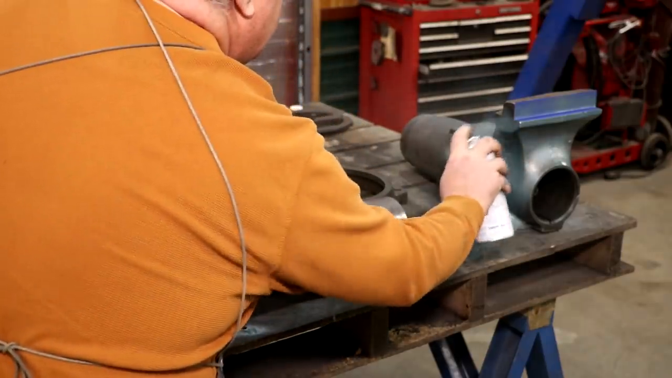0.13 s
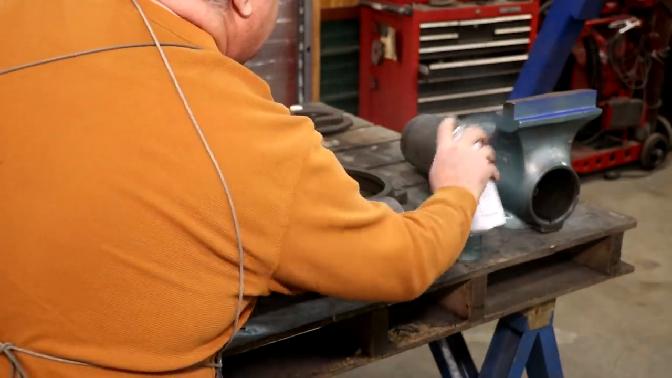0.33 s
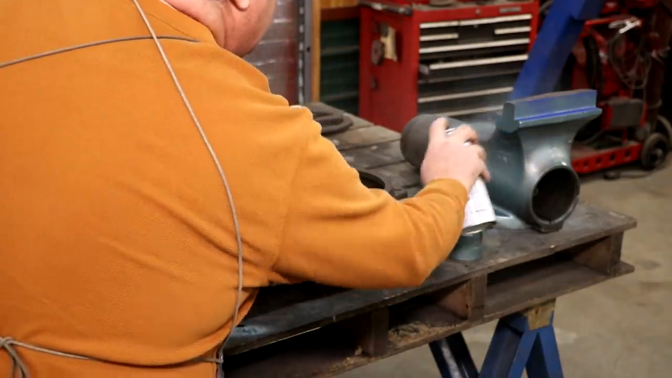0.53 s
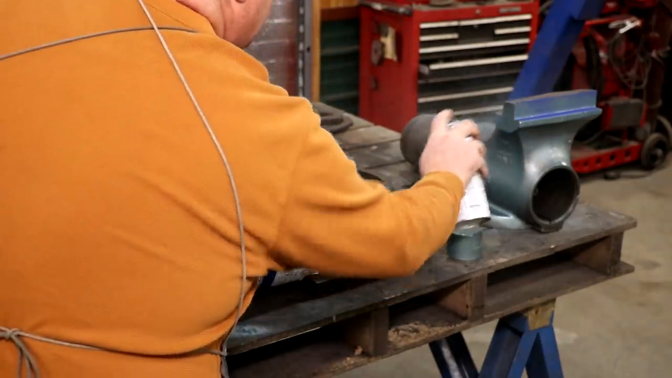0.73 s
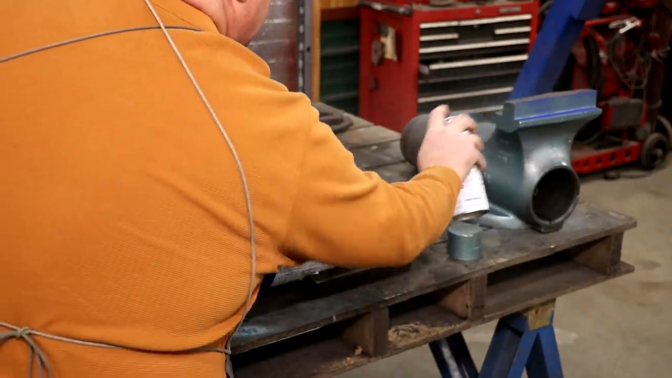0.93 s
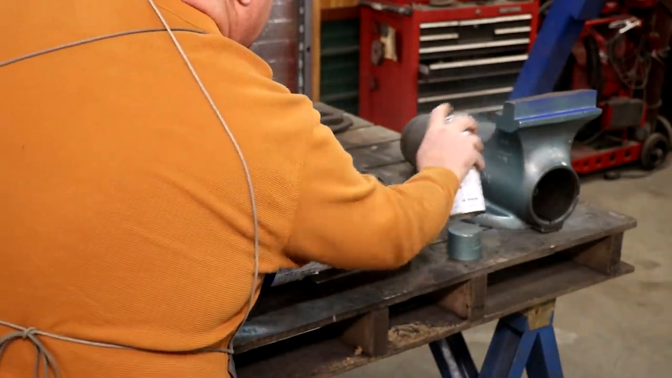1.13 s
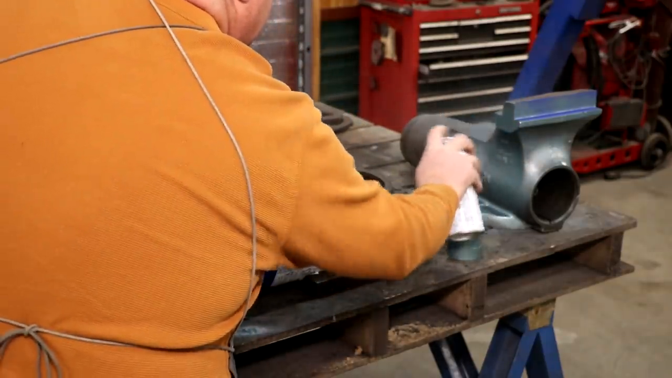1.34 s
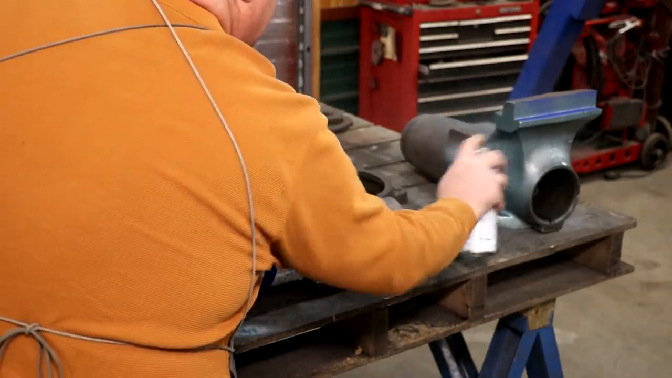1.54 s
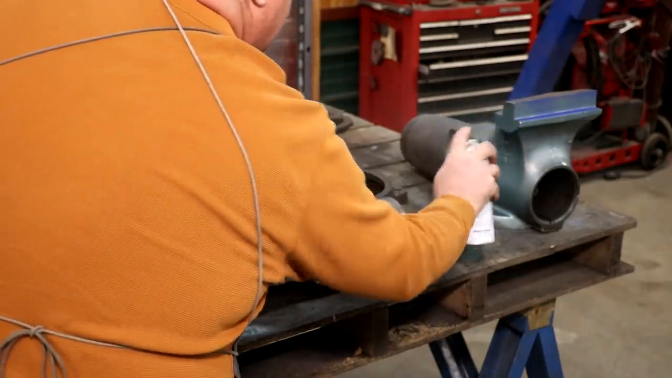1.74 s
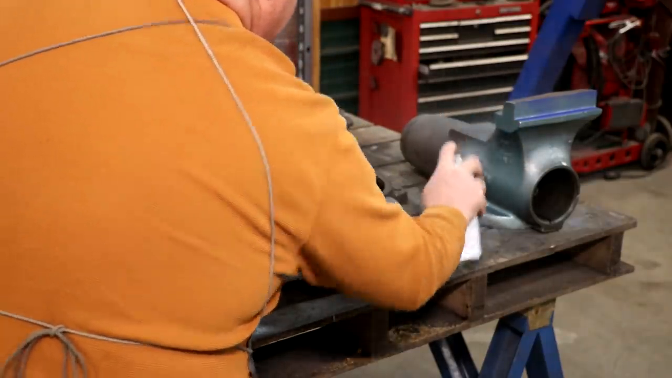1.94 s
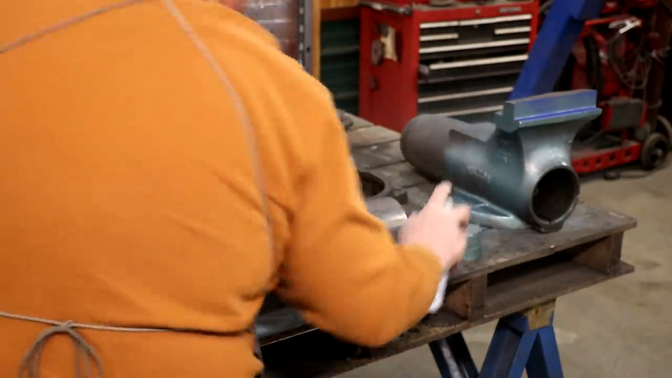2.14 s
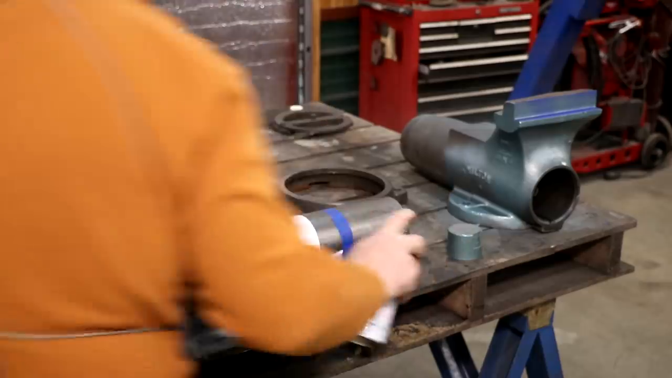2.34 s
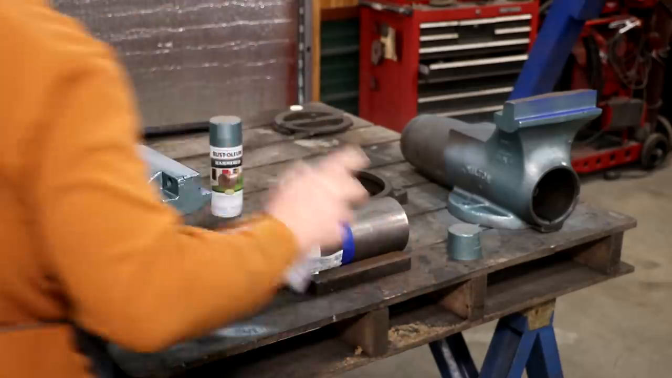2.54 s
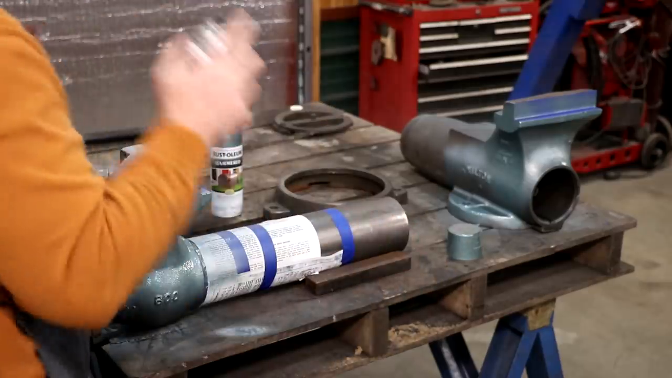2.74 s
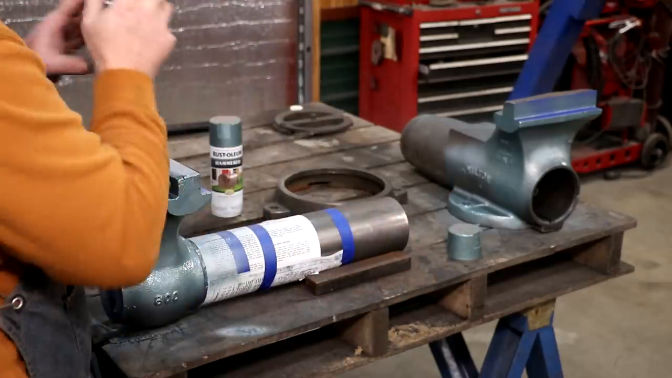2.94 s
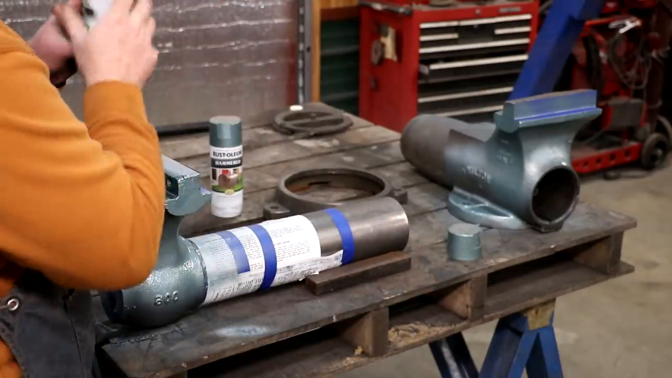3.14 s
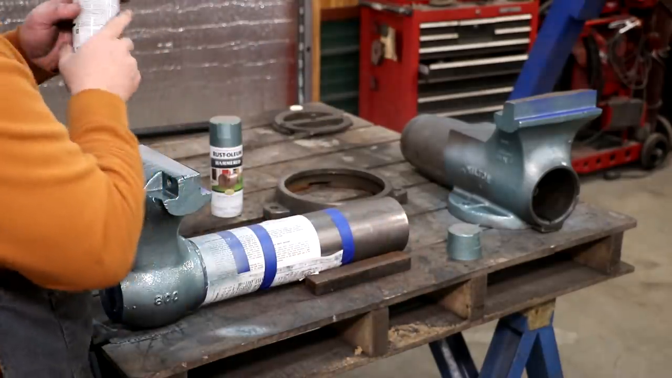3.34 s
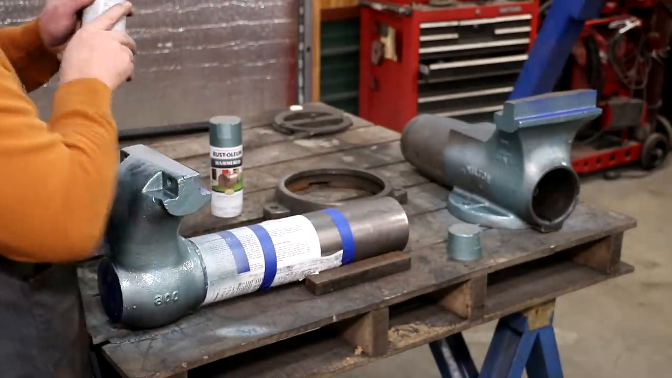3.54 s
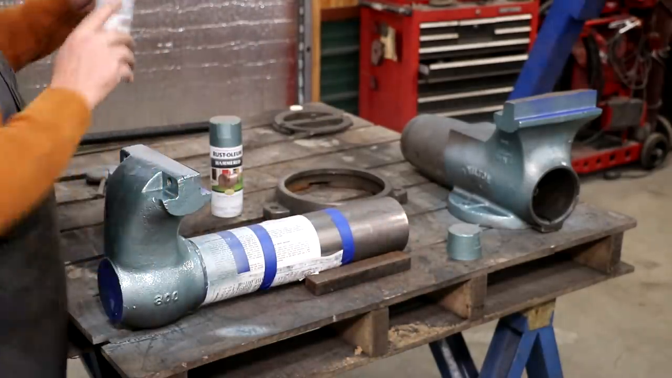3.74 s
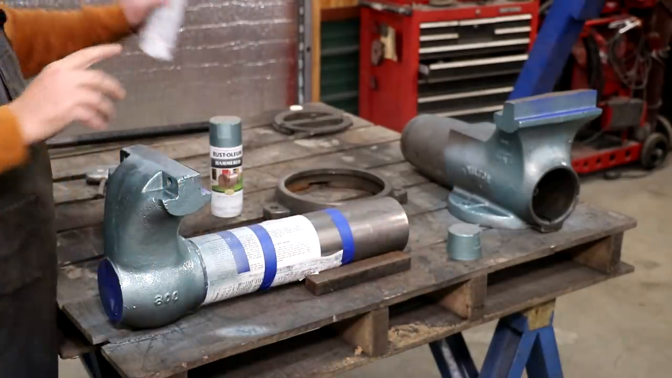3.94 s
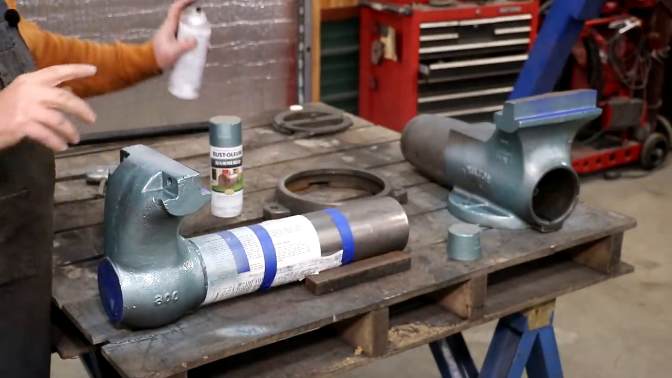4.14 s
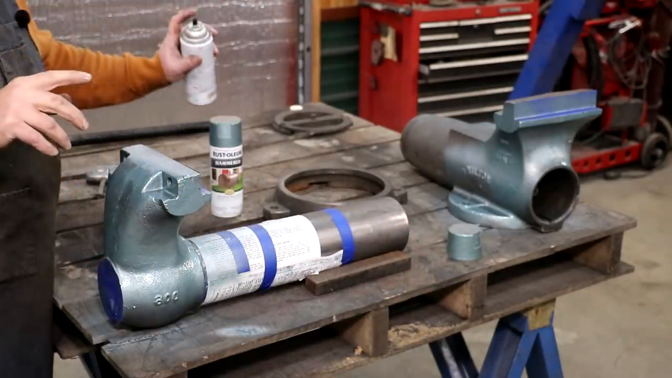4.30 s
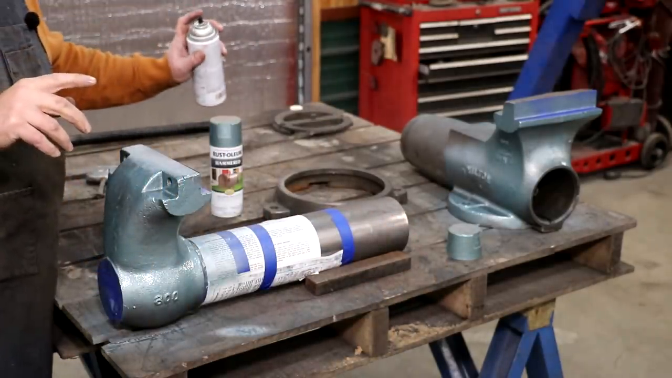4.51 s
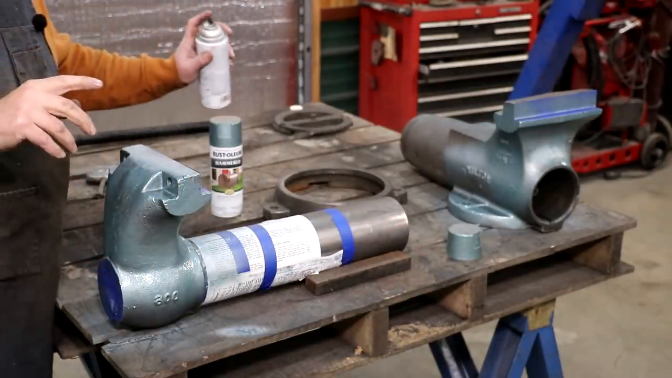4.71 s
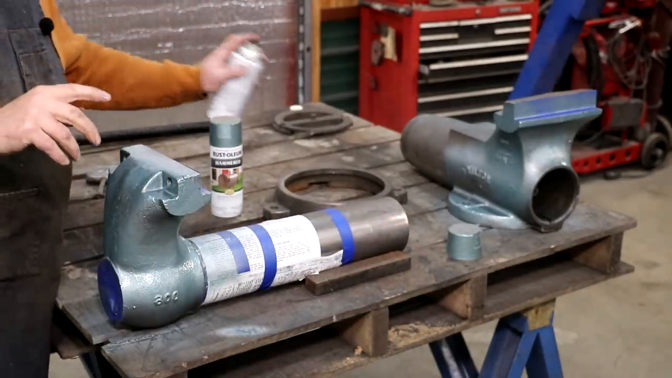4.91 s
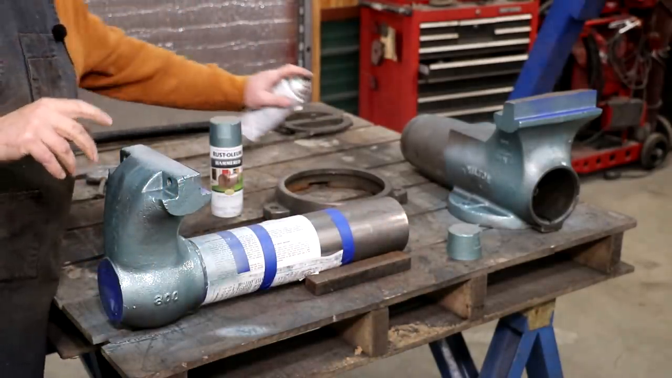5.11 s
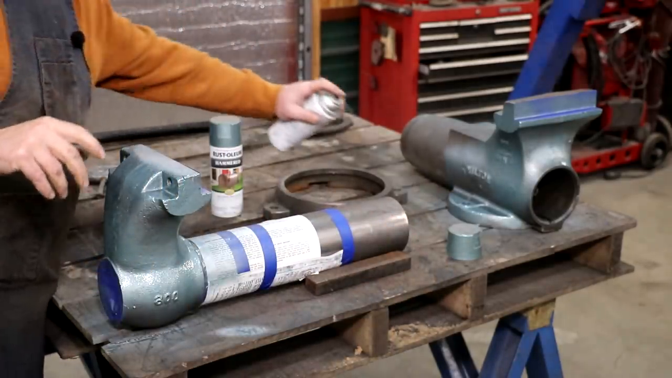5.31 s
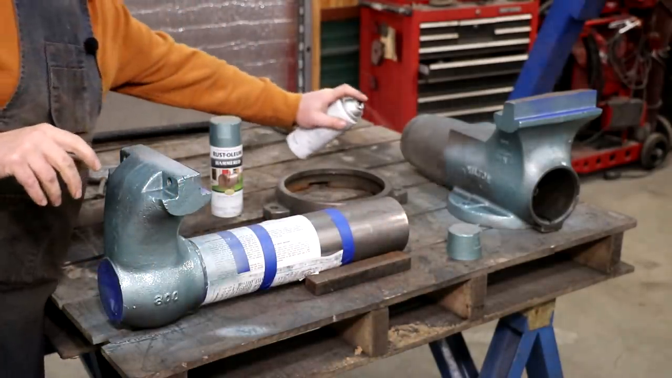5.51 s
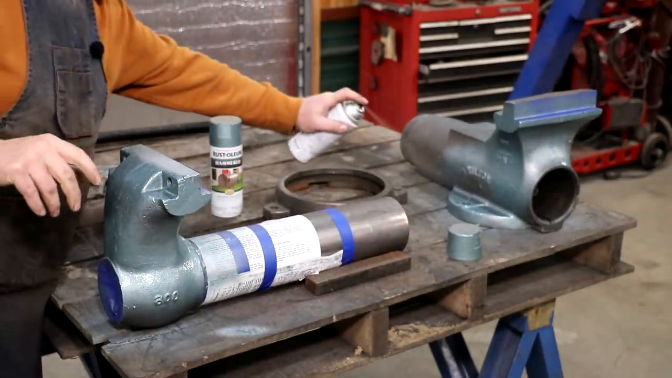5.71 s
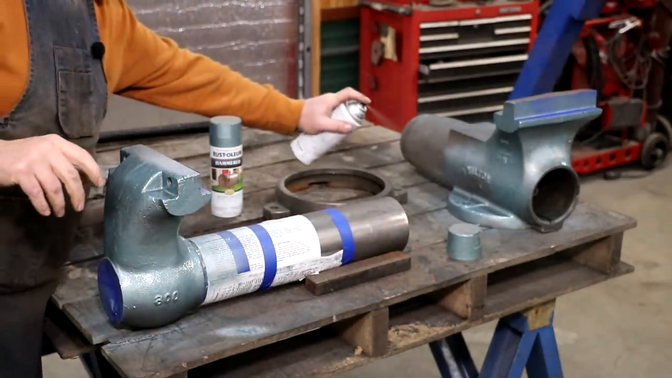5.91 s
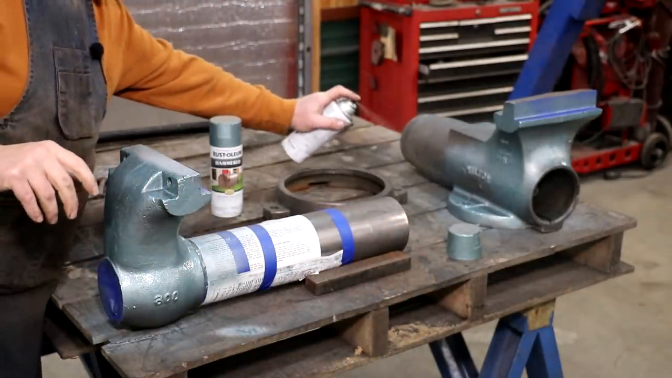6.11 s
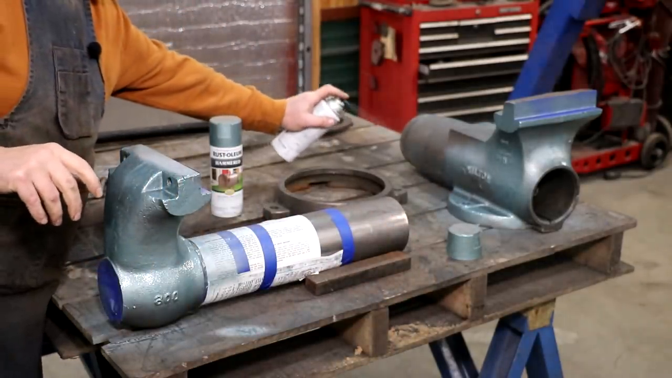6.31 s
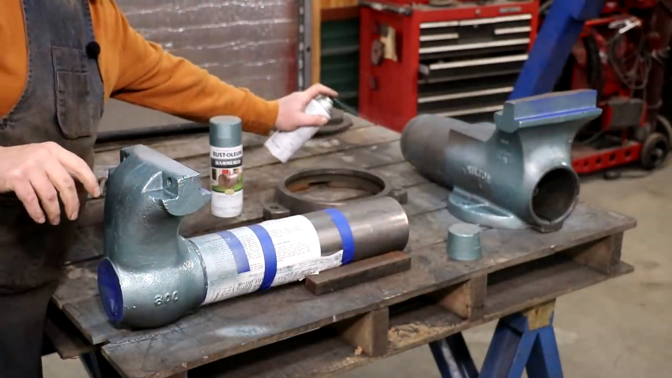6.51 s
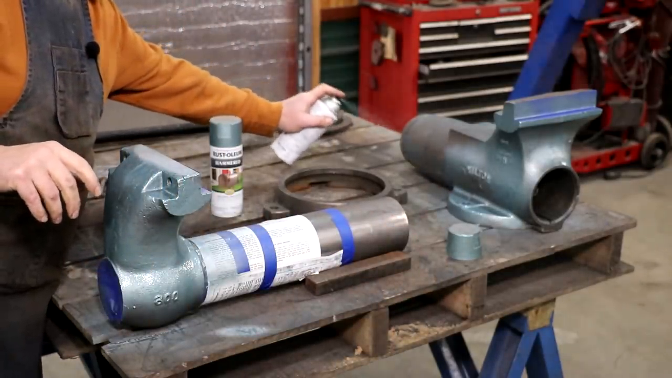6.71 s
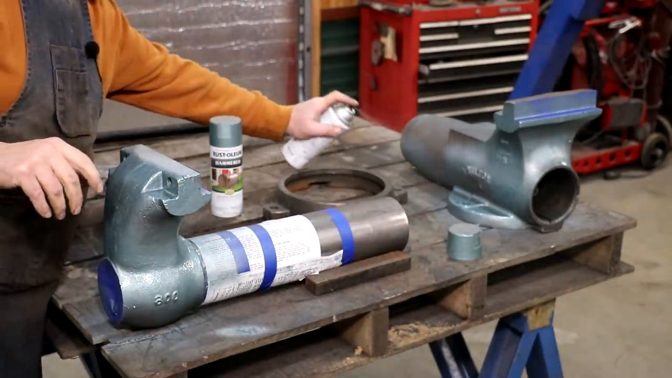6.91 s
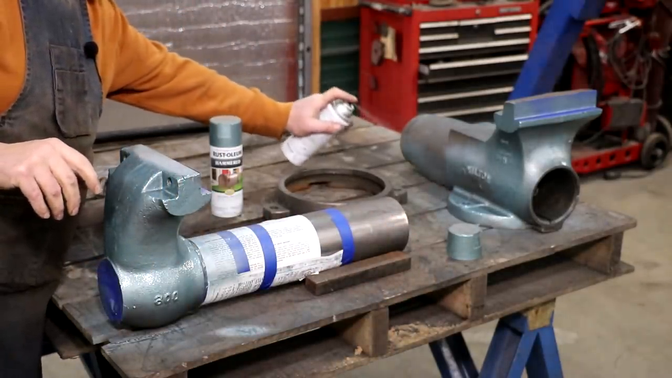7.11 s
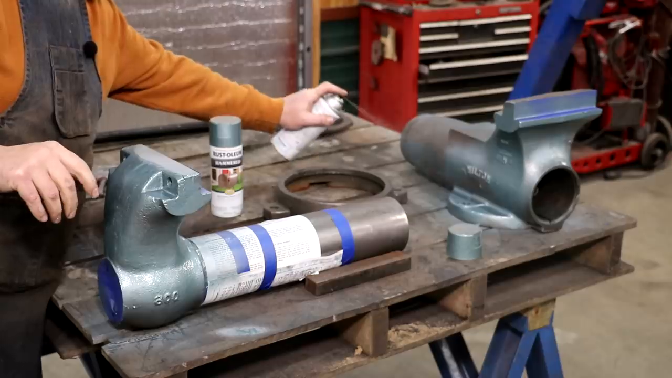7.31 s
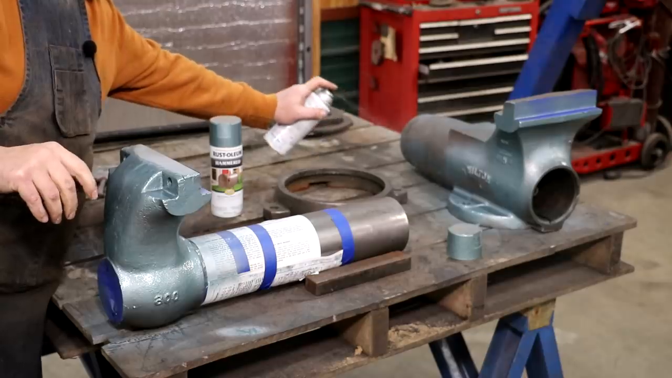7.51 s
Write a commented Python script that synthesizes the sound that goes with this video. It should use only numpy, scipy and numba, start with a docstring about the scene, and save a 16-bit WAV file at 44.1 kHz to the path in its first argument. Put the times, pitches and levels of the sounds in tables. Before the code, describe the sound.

A quiet workshop with faint low hum and hiss, heard from a microphone worn on the painter's chest, identical in both channels. From 0 to 2 s an aerosol can sprays nearby: a steady, bright, roaring hiss around 4 kHz, wavering slightly with the hand and reflecting off steel, then cutting off sharply. From 2 s cloth rubs the microphone in soft uneven scuffs while the can is turned; its ball scrapes and paint swishes. Knocks start near 2.65 s, cluster at 3.0-3.7, and peak with a loud clack at 4.0 followed by rapid rattling to 4.3. A crisp plastic double click comes at 4.6, then a few ball knocks at 4.8-5.15. From 5.2 s a softer, farther spray hisses unevenly, with small cloth thumps at 5.4 and 5.85. At 6.95 metal lands with a brief ringing clank and ticks until 7.1, echoing in the shop; the spray fades by 7.5.

```python
"""A spray can hisses over a steel casting in a workshop, heard by one microphone on the painter's chest.
The jet is coloured noise with a moving roar and echoes off the steel; the shop is quiet shaped noise.
He lets go, turns and tips the can: scraping noise and struck modes make its mixing ball roll and knock,
uneven noise makes his clothes rub the microphone, and the button clicks as a few short partials.
He then sprays from further off, while metal falls and clatters in the shop as ringing modes and ticks."""
import sys
import numpy as np
from scipy import signal
from scipy.fft import rfft, irfft
from scipy.io import wavfile
from scipy.ndimage import uniform_filter1d, map_coordinates
from numba import njit

SR = 44100
rng = np.random.default_rng(int(sys.argv[2]) if len(sys.argv) > 2 else 0)


def gain_from_db(level_db):
    """Turn a decibel level (scalar or array-like) into a linear amplitude factor."""
    decades = np.asarray(level_db, float) / 20
    return 10 ** decades


def master(y):
    """Save y as 16-bit WAV."""
    cut = np.clip(np.atleast_2d(y).T, -1, 1)
    pcm = np.round(cut * 32767)  # scale
    wavfile.write(sys.argv[1], SR, pcm.astype(np.int16))


N = 332955
T = np.arange(N) / SR
HZ = np.fft.rfftfreq(N, 1 / SR) + 1  # the offset keeps the logarithm finite


def unit(x):
    """Scale to rms 1."""
    return x / np.sqrt(np.mean(x ** 2))


def curves(table):
    """A smoothed on-off gate for the table's span, then its columns joined over time."""
    s, *columns = np.transpose(table)
    on = uniform_filter1d(1. * ((T >= s[0]) & (T <= s[-1])), size=300)
    return on, *(np.interp(T, s, column) for column in columns)


def shaped(x, points):
    """Colour a sound by (pitch_hz, level_db) points joined over log frequency."""
    hz, db = np.transpose(points)
    return irfft(rfft(x) * gain_from_db(np.interp(np.log(HZ), np.log(hz), db)), N)


def band(x, lo_hz, hi_hz):
    """Band-pass."""
    return signal.sosfilt(signal.butter(3, [lo_hz, hi_hz], "band", fs=SR, output="sos"), x)


def walk(rate):
    """Random levels held 1 / rate seconds and slewed twice, at rms 1."""
    hold = int(SR / rate)
    steps = np.repeat(rng.standard_normal(N // hold + 1), hold)
    slewed = uniform_filter1d(uniform_filter1d(steps, hold), hold)
    return unit(slewed[:N])


def grit(spread_db):
    """Noise whose grains differ in size: 0 is smooth, more is crackly."""
    grain_db = spread_db * np.minimum(rng.exponential(size=N), 5)
    return unit(rng.standard_normal(N) * gain_from_db(grain_db))


@njit
def moving_band(x, hz, width_hz):
    """State-variable band-pass with a moving centre, gain 1 there."""
    y, b, l = np.empty(len(x)), 0., 0.  # b and l: band-pass and low-pass states
    for i in range(len(x)):
        g, k = np.tan(np.pi * hz[i] / SR), width_hz / hz[i]
        v = (b + g * (x[i] - l)) / (1 + g * (g + k))
        b, l, y[i] = 2 * v - b, l + 2 * g * v, k * v
    return y


def ring(hz, gains, t60_ms, length_s):
    """Decaying modes with chance signs; each falls 60 dB in its ring time."""
    t = T[:int(length_s * SR), None]
    decay = 1000. ** (-1000 * t / np.clip(t60_ms, 4, 2000))
    signs = rng.choice([-1, 1], len(hz))
    return (gains * signs * np.sin(2 * np.pi * hz * t) * decay).sum(1)


def add(out, s, sound, peak_db):
    """Mix a sound in at s with the given peak."""
    i = int(s * SR)
    sound = sound[:N - i]
    out[i:i + len(sound)] += sound * gain_from_db(peak_db) / np.abs(sound).max()


def room(x, tail_db, fall_s):
    """The shop adds a diffuse tail of decaying noise."""
    tail = rng.standard_normal(SR) * np.exp(-T[:SR] / fall_s)
    return x + gain_from_db(tail_db) * signal.fftconvolve(x, tail / np.linalg.norm(tail))[:N]


# the two spray passes, near then far: start_s, level_db of the jet, pitch_hz at the centre of its roar
SPRAY_PASSES = [
    [(0.0, -32.5, 3870), (0.05, -32.5, 3780), (0.8, -34, 3950), (0.96, -32, 4300), (1.06, -34, 3970),
     (1.07, -32, 3960), (1.27, -34, 4000), (1.4, -33, 4470), (1.51, -34, 4400), (1.79, -32.5, 4120),
     (1.97, -34.5, 3900), (2.0, -51, 4210)],
    [(5.2, -48, 3800), (5.26, -39.5, 4400), (5.42, -35.5, 4630), (5.47, -42, 4300), (5.575, -41.5, 4300),
     (5.6, -37, 4000), (5.75, -38, 4350), (5.88, -39.5, 4200), (5.9, -35, 4250), (6.07, -37.5, 4530),
     (6.24, -39, 4150), (6.33, -38, 4700), (6.45, -40, 4500), (6.58, -38, 3980), (6.86, -39.5, 4800),
     (7.1, -34.5, 4100), (7.37, -44.5, 4500), (7.55, -49.5, 3850)],
]
# the button in each pass: press_s, release_s, usual_db of the jet,
# upper_db of the upper hiss and fizz_db of the nozzle fizz, both over the usual jet
BUTTON = [(-1, 1.98, -32.5, -8, -11.5), (5, 9, -37.5, -5, -9)]
# colour of the jet close to the chest: pitch_hz, level_db (relative)
NEAR_JET = [(47, -45), (80, -21), (329, -19), (682, -11.5), (950, -19.5), (1210, -12), (2300, -21),
            (3000, -4.5), (4080, 1.5), (4660, -2), (5810, -21), (8090, -8), (9660, -36), (14100, -27.5),
            (15700, -26)]
# colour of the jet from further off: pitch_hz, level_db (relative)
FAR_JET = [(180, -46), (300, -28), (601, -16.5), (956, -24.5), (1470, -10.5), (1680, -18.5), (1950, -12),
           (2810, -14.5), (3780, -3), (4530, 3), (5180, -13), (7960, -14), (9400, -30), (11700, -14.5),
           (15700, -14.5)]


def spray(table, button, colour, path_ms, echo, sweep_ms):
    """Turbulent jet: a roar whose centre follows the aim, and steadier hiss; nearby steel adds moving echoes."""
    upper_follows, fizz_follows = 0.31, 0.6  # share of the jet's level changes they take part in
    upper_builds_s, fizz_builds_s, valve_shuts_s = 0.12, 0.03, 0.014  # time constants
    on, level_db, hz = curves(table)
    press_s, release_s, usual_db, upper_db, fizz_db = button
    since_s = np.maximum(T - press_s, 0)
    # the layers are scaled by the jet's level at the end, so take back what they do not follow
    upper_db = upper_db + (upper_follows - 1) * (level_db - usual_db)
    fizz_db = fizz_db + (fizz_follows - 1) * (level_db - usual_db)

    noise = shaped(grit(3.66), colour)
    scale = np.std(band(noise, 3900, 5960))
    low = band(noise, 34, 2220) / scale
    body = band(noise, 2900, 5840) / scale
    aim_hz = hz * (1 + 0.02 * walk(8))
    roar = unit(moving_band(rng.standard_normal(N), aim_hz, 930.0)) * gain_from_db(1.8 * walk(11))
    upper = unit(band(noise, 5750, 10150)) * gain_from_db(upper_db + 2.44 * walk(14))
    fizz = unit(band(noise, 9580, 15100)) * gain_from_db(fizz_db + 1.5 * walk(24))

    jet = 0.68 * body * gain_from_db(1.1 * walk(14)) + 0.78 * roar
    valve = np.exp(-np.maximum(T - release_s, 0) / valve_shuts_s)
    upper_rise = np.tanh(since_s / upper_builds_s)
    fizz_rise = np.tanh(since_s / fizz_builds_s) ** 2
    jet = jet + valve * (upper * upper_rise + fizz * fizz_rise)
    out = jet
    for ms in path_ms:
        # the hand sweeps the can, so each echo's path and strength keep changing
        lag = SR / 1000 * (ms + sweep_ms * walk(8))
        strength = echo * gain_from_db(1.75 * walk(5.4))
        out = out + strength * map_coordinates(jet, [np.arange(N) - lag], order=3)
    return on * gain_from_db(level_db) * (low + out / np.sqrt(1 + len(path_ms) * echo ** 2))


# colour of the empty shop: pitch_hz, level_db (relative)
SHOP_COLOUR = [(18, -40), (30, 1), (141, 5), (361, 0), (434, 0), (1170, -2.5), (2320, -4), (3010, 0),
               (5360, -16.5), (6970, -31), (15700, -23)]


def shop():
    """The quiet hum and hiss of the room: shaped noise whose level drifts."""
    return gain_from_db(-51 + 1.0 * walk(3.5)) * unit(shaped(rng.standard_normal(N), SHOP_COLOUR))


# cloth on the microphone: start_s, level_db of the rub
CLOTH = [(1.95, -57.5), (2.13, -48), (2.16, -43), (2.19, -51.5), (2.38, -49.5), (2.5, -38), (2.64, -59),
         (2.7, -50.5), (3.05, -38), (3.14, -47), (3.72, -49), (3.76, -37.5), (4.2, -62), (4.31, -59),
         (4.57, -79), (4.6, -58), (4.67, -56), (4.77, -73), (4.82, -52), (4.92, -59), (5.14, -46.5),
         (5.61, -56.5), (5.73, -44), (5.82, -77), (5.86, -43), (5.9, -69), (6.1, -60)]
# tugs on the microphone: start_s, peak_db, pitch_hz
TUGS = [(2.156, -28.5, 328), (5.426, -33.5, 292), (5.849, -35.5, 197)]


def cloth():
    """Fabric drags over the microphone in uneven slips; a few tugs thump."""
    middle_db, rustle_db, follows = -54, -2, 0.89  # at middle_db rub, the rustle is rustle_db over it
    sleeve_db = -18  # rustle of the sleeve that tips the can, over the rolling
    on, level_db = curves(CLOTH)
    rustle = on * gain_from_db(middle_db + rustle_db + follows * (level_db - middle_db))
    rolling_gain, _ = motion()
    rustle = rustle + rolling_gain * gain_from_db(sleeve_db)
    slips = grit(3.35) * gain_from_db(1.67 * walk(30))
    out = on * gain_from_db(level_db) * unit(band(slips, 60, 340)) + rustle * unit(band(slips, 340, 1300))
    t = T[:800]
    for s, peak_db, hz in TUGS:
        add(out, s, np.sin(2 * np.pi * hz * t) * t * np.exp(-t / 0.0015), peak_db)
    return out


# ball and paint moving in the can: start_s, level_db of the scraped wall, paint_db thrown about
ROLL = [(2.0, -52, 2), (2.27, -62.5, 6), (2.55, -45.5, -7), (2.72, -54, -2.5), (2.88, -45.5, 2.5),
        (3.17, -56.5, -2), (3.35, -51, 12), (3.6, -40, -4), (3.9, -52.5, 9), (4.02, -41, 3),
        (4.17, -46.5, 1), (4.33, -41.5, 5), (4.61, -53, 3.5), (4.78, -71.5, 9.5), (4.98, -50, -7),
        (5.13, -45.5, 2.5), (5.42, -44.5, -8), (5.55, -60, -6)]
# shakes that send ball and paint along the wall: start_s, length_s, level_db, paint_db thrown about
SHAKES = [(2.105, .06, -61, -2), (2.351, 0.024, -50, -6), (2.888, 0.11, -43, -6), (3.021, 0.12, -43.5, 4.5),
          (3.209, 0.055, -34.5, -4), (3.429, 0.09, -51, 10.5), (3.645, 0.046, -35.5, -6),
          (3.8, 0.065, -47, -2.5)]


def motion():
    """Gain and thrown paint of the can's contents: slow roll plus shakes; the stronger sets the colour."""
    rise_s, fall_s = 0.012, 0.018  # time constants of a shake
    on, level_db, paint_db = curves(ROLL)
    gain = on * gain_from_db(level_db)
    paint = gain * paint_db
    for s, length_s, shake_db, thrown_db in SHAKES:
        slope = np.minimum((T - s) / rise_s, (s + length_s - T) / fall_s)
        shake = gain_from_db(shake_db) * np.exp(np.minimum(0, slope))
        gain, paint = gain + shake, paint + shake * thrown_db
    return gain, paint / (gain + 1e-9)


# modes of the can: pitch_hz, level_db (relative), ring_ms to fall 60 dB; the knocks strike them too
CAN = [(1408, 3, 80), (1790, 8, 85), (1973, 9, 26), (2110, 9.5, 34), (3127, 4, 86), (3565, 4, 49),
       (3770, 9, 16.3), (4210, -16, 140), (4800, 1, 58), (5270, -29, 92), (5900, 11.5, 36),
       (6560, 12.5, 96), (7140, 14, 45), (7940, 2, 150), (8330, 5.5, 64)]


def rolling():
    """The ball scrapes the wall: dense tiny impacts ring the can's modes, each more or less as it moves on."""
    gain, paint_db = motion()
    rub = grit(3.52) * gain_from_db(1.2 * walk(40))
    groups = np.zeros((3, N))  # low, middle and upper modes
    for hz, db, t60_ms in CAN:
        r = 1000. ** (-1000 / t60_ms / SR)
        mode = signal.lfilter([1], [1, -2 * r * np.cos(2 * np.pi * hz / SR), r * r], rub)
        groups[int(hz > 2600) + int(hz > 5000)] += unit(mode) * gain_from_db(db + 3.0 * walk(6))
    # louder rolling presses the ball harder, and the wall modes stand out of the scrape
    firm = (gain / gain_from_db(-38.5)) ** 0.5

    def blend(modes, scrape, share):
        """Wall modes against bare scrape, kept at one level."""
        return (firm * unit(modes) + share * unit(scrape)) / np.hypot(firm, share)

    low_wall = blend(groups[0], band(rub, 1260, 2730), 0.91)
    middle_wall = blend(groups[1], band(rub, 2350, 4780), 1.3)
    swirl = unit(shaped(rub, [(4300, -30), (5200, 8.5), (7500, -1), (9500, -9), (12000, -42)]))
    swish = unit(unit(groups[2]) + 8.5 * swirl)
    late_rub = np.roll(rub, 400)  # 9 ms behind the scrape
    splash = unit(shaped(late_rub, [(7000, -21), (8800, 3.5), (12000, 4), (16000, -7)]))
    out = low_wall
    # each layer: dB over the low wall modes, share of the thrown paint's dB
    for layer, db, share in ((middle_wall, 1.75, 0.4), (swish, -2, 0.8), (splash, -16, 1.1)):
        out = out + layer * gain_from_db(db + share * paint_db + 1.2 * walk(16))
    return gain * out


# knocks of the ball: start_s, peak_db, low_hz and high_hz of the favoured modes,
# bright_db tilt to the upper modes, ring_share of the can's ring times
KNOCKS = [(2.6506, -29.5, 1320, 7360, 1, 0.44), (2.75, -32, 1390, 3050, 5, 0.33),
          (3.027, -20.5, 1810, 3060, 0, 0.61), (3.2794, -20, 1800, 3210, -11, 0.33),
          (3.3027, -13.5, 1930, 3600, 0.5, 0.92), (3.3599, -10.5, 1790, 3370, -0.5, 0.21),
          (3.3746, -18.5, 1900, 3580, 0.5, 0.4), (3.4319, -19, 1700, 3670, 2, 0.43),
          (3.49, -25, 1900, 5500, 9, 0.3), (3.6673, -16, 1780, 4470, 2, 0.18),
          (3.6795, -22, 1740, 3500, -6, 0.46), (4.0118, -4.5, 1400, 3490, 0.5, 0.38),
          (4.062, -18.5, 1940, 3570, -5, 0.65), (4.0925, -20, 1960, 3540, -5, 0.4),
          (4.1073, -8.5, 2060, 3800, 5.5, 0.66), (4.139, -16, 2100, 3770, 5.5, 1),
          (4.1873, -18.5, 2150, 3920, 3, 0.92), (4.1999, -13, 1670, 3620, 3, 0.3),
          (4.2303, -19, 2110, 6560, 6, 0.4), (4.2572, -18, 2090, 6800, 6, 0.4),
          (4.2785, -15, 1750, 3580, 3.5, 0.5), (4.2812, -16, 1740, 3550, 3, 0.51),
          (4.3157, -12, 1740, 3750, 7, 0.71), (4.8263, -34, 1380, 2930, -5, 0.23),
          (4.8731, -32.5, 1730, 2880, -3, 0.29), (5.0515, -23, 1450, 6560, -2, 0.6),
          (5.0885, -18.5, 1740, 3500, 1, 0.34), (5.1213, -14, 1960, 6100, -0.5, 0.4),
          (5.1378, -20, 2050, 4000, 3, 0.28), (5.1474, -23, 2080, 4170, 2, 0.55)]


def knocks():
    """Each knock is a short crack, then the can's modes; place and grip set the colour and the damping."""
    hz, db, t60_ms = np.transpose(CAN)
    out = np.zeros(N)
    for s, peak_db, *spot_hz, bright_db, share in KNOCKS:
        low_db, middle_db, upper_db = np.add((-13.5, -8.5, -18), bright_db * np.arange(-1, 2))
        group_db = np.where(hz < 2600, low_db, np.where(hz < 5000, middle_db, upper_db))
        # modes near a favoured pitch are louder and ring longer
        spot = np.exp(-(np.log(hz[:, None] / spot_hz) / 0.096) ** 2).sum(1)
        ring_ms = share * t60_ms * 1.7 ** spot * np.where(hz < 5000, 1, 0.5)
        detune, uneven = rng.standard_normal((2, len(hz)))
        mode_db = db + group_db + 9.7 * spot + 3.0 * uneven
        modes = ring(hz * (1 + 0.012 * detune), gain_from_db(mode_db), ring_ms, 0.2)
        burst = rng.standard_normal(len(modes)) * np.exp(-T[:len(modes)] / 0.0019)
        crack = gain_from_db(low_db) * band(burst, 1500, 2720)
        crack += gain_from_db(middle_db) * band(burst, 2120, 6540)
        crack += gain_from_db(upper_db) * band(burst, 5400, 13000)
        add(out, s, band(modes + 7.2 * crack, 900, 16000), peak_db)
    return room(out, -13.5, 0.018)


# clicks of the plastic button: start_s, peak_db, pitch_hz of the lowest partial
CLICKS = [(4.601, -20, 2750), (4.6044, -13.5, 2480)]


def button_clicks():
    """The button ticks as five partials that die within milliseconds."""
    ratios, gains = np.array([1, 1.5, 2.1, 2.9, 4.2]), gain_from_db([-1.5, 3, -7, -10.5, -33])
    out = np.zeros(N)
    for s, peak_db, click_hz in CLICKS:
        add(out, s, ring(click_hz * ratios, gains, 8.9, 0.05), peak_db)
    return room(out, -13.5, 0.018)


# modes of the fallen metal: pitch_hz (each is split in two around it), level_db (relative), ring_ms to fall 60 dB
METAL = [(148, -20, 70), (350, -6, 44), (510, -16, 380), (581, -7, 200), (603, -9, 460), (703, -6, 620),
         (721, -5.5, 540), (895, -8.5, 260), (1127, -2.5, 140), (1287, -2, 150), (1430, -17, 80),
         (1740, -17, 65), (2110, -18, 90), (2200, -1, 130), (4000, 0.5, 50), (5460, 1, 33)]
# its landing: start_s, peak_db
LANDING = [(6.955, -14)]
# ticks of its loose part: start_s, peak_db, pitch_hz of the second partial
RATTLE = [(7.007, -21, 1980), (7.0174, -16, 2080), (7.035, -15.5, 1710), (7.051, -27, 2010),
          (7.056, -15, 1660), (7.0684, -20, 2090), (7.0758, -20, 1570)]


def fallen_metal():
    """One landing cracks, thuds and rings the piece, which wobbles as it rocks; a loose part ticks on it."""
    hz, db, t60_ms = np.transpose(METAL)
    ratios, gains = np.array([.85, 1, 1.2, 2.2, 3.3]), gain_from_db([-10, 3, -4, 4, -1.5])
    out = np.zeros(N)
    for s, peak_db in LANDING:
        modes = 0
        for tune in (0.988, 1.008):  # two detuned copies beat together
            wobble = gain_from_db(2.0 * walk(45)[:int(0.6 * SR)])
            modes = modes + ring(hz * tune, gain_from_db(db), t60_ms, 0.6) * wobble
        noise = rng.standard_normal(len(modes))
        thud = band(noise * np.exp(-T[:len(modes)] / 0.033), 320, 1880)
        crack = band(noise * np.exp(-T[:len(modes)] / 0.0061), 3500, 10000)
        add(out, s, modes + 3.8 * thud + 1.5 * crack, peak_db)
    for s, peak_db, tick_hz in RATTLE:
        add(out, s, ring(tick_hz * ratios, gains, 5.5, 0.05), peak_db)
    return room(out, -4.5, 0.17)


def scene():
    """All sources reach one microphone, the same in both channels."""
    near = spray(SPRAY_PASSES[0], BUTTON[0], NEAR_JET, path_ms=(.45, 1.1, 1.9), echo=0.16, sweep_ms=0.054)
    far = spray(SPRAY_PASSES[1], BUTTON[1], FAR_JET, path_ms=(.5, 1.2, 2.1), echo=0.3, sweep_ms=0.072)
    can = rolling() + knocks() + button_clicks()
    mono = near + far + shop() + cloth() + can + fallen_metal()
    return np.array([mono, mono])


def band_limit(x):
    """A steep low-pass at the top of the band."""
    return signal.sosfilt(signal.butter(12, 16640, fs=SR, output="sos"), x)


def record(dry):
    """The microphone drops the deepest bass and the top is cut steeply at 15750 Hz."""
    x = signal.sosfilt(signal.butter(1, 35, "high", fs=SR, output="sos"), dry)
    x = signal.sosfilt(signal.ellip(14, 0.3, 70, 15750, fs=SR, output="sos"), x)
    return band_limit(x)


dry = scene()
out = record(dry)
master(out)
```